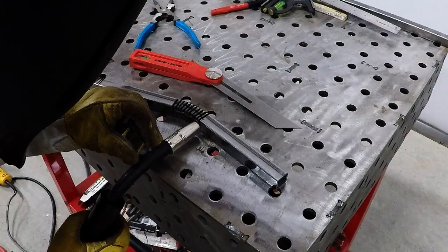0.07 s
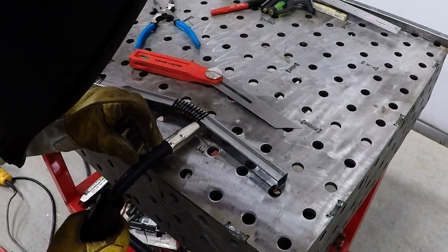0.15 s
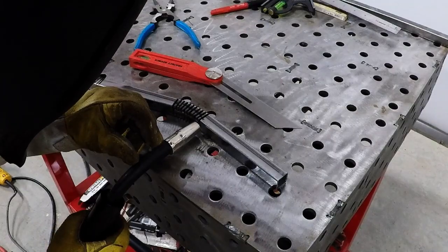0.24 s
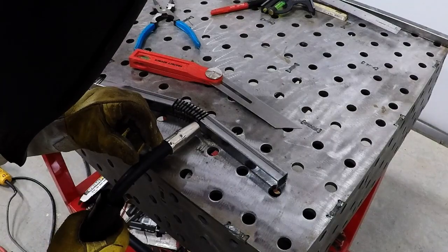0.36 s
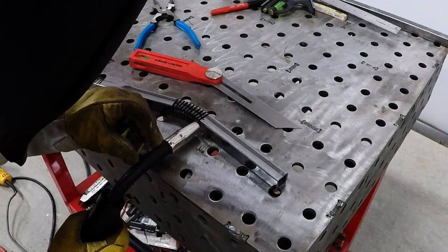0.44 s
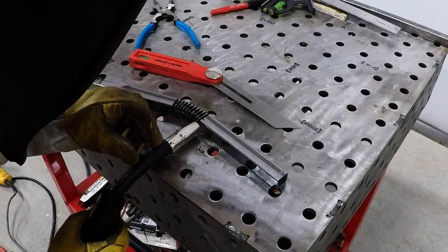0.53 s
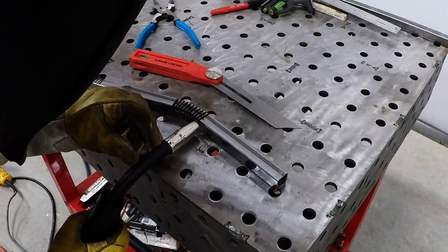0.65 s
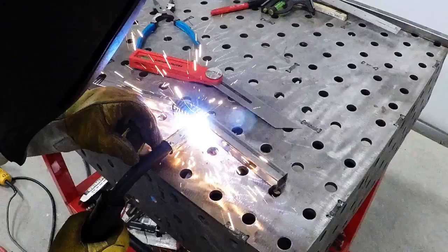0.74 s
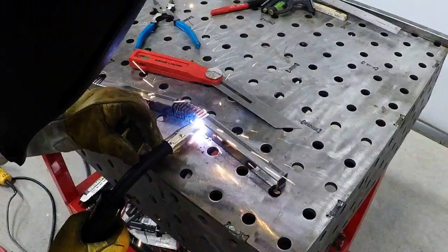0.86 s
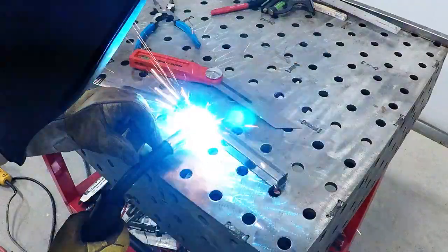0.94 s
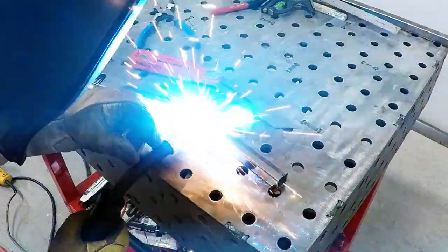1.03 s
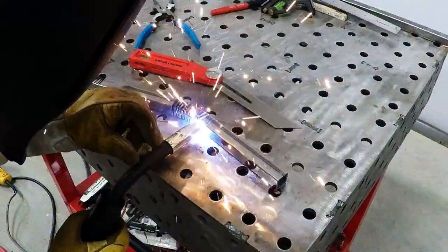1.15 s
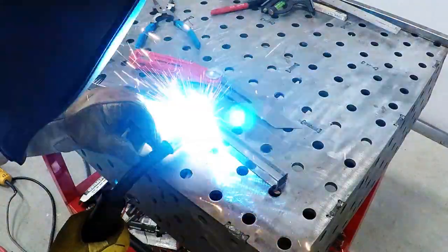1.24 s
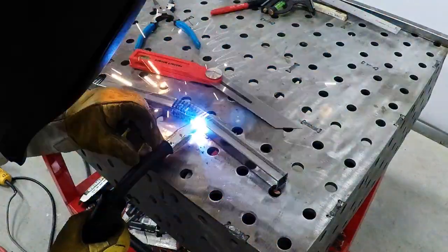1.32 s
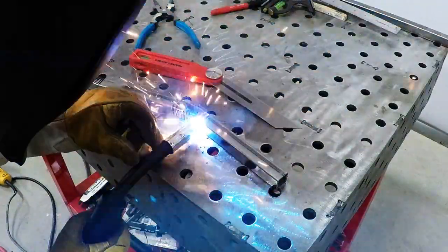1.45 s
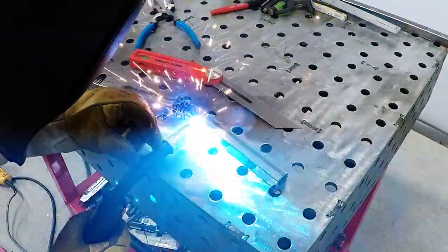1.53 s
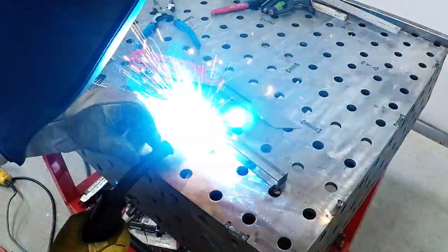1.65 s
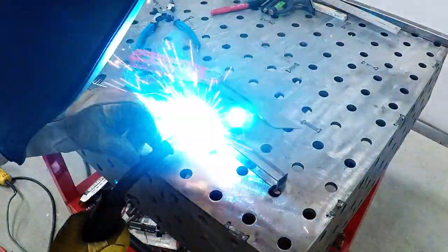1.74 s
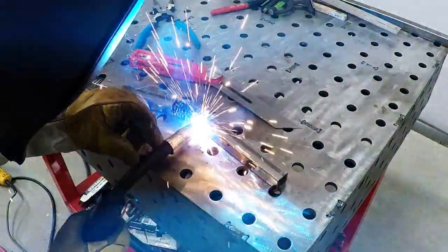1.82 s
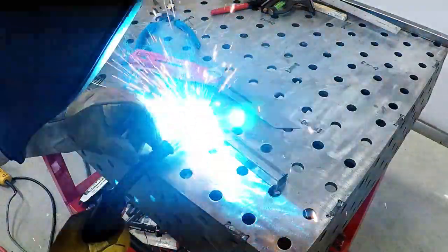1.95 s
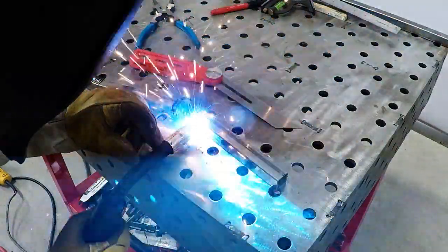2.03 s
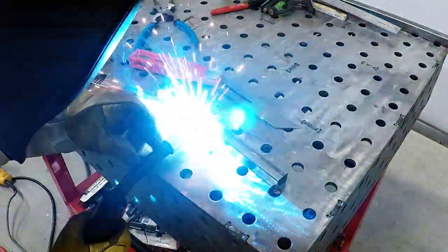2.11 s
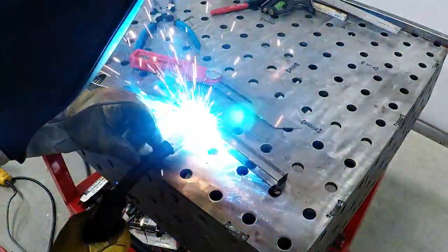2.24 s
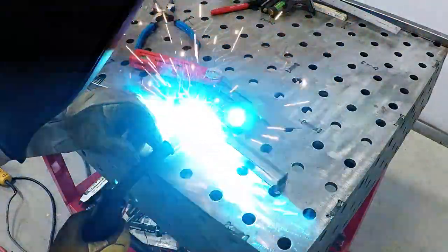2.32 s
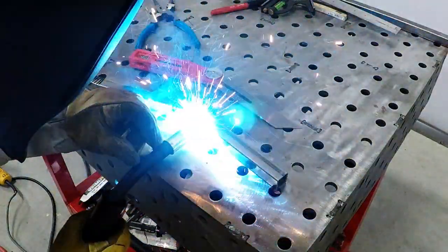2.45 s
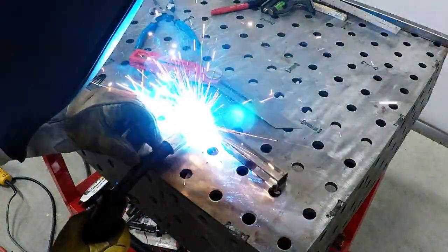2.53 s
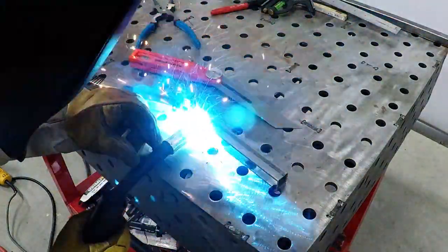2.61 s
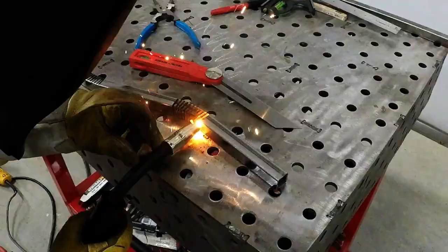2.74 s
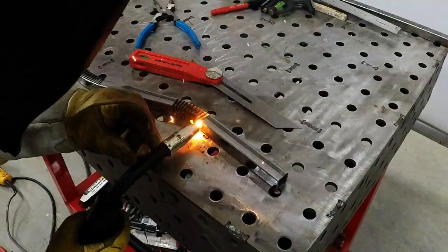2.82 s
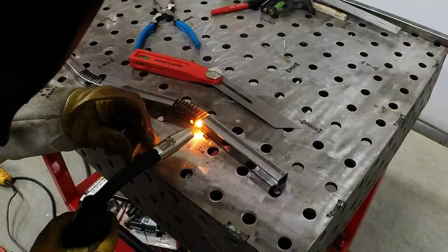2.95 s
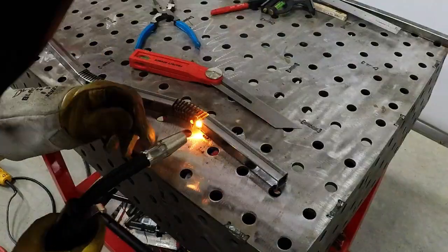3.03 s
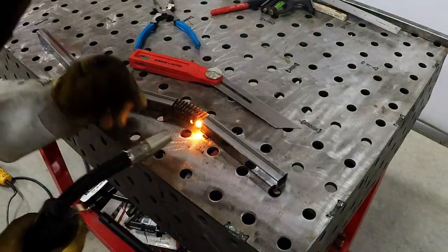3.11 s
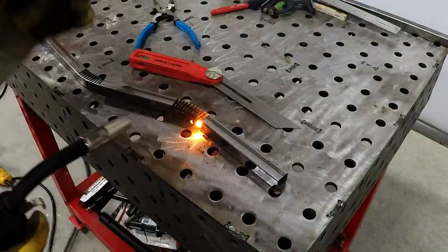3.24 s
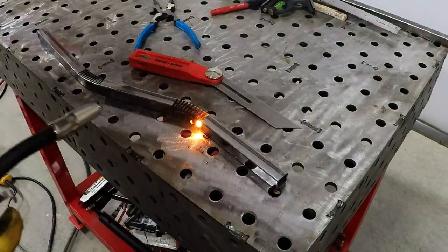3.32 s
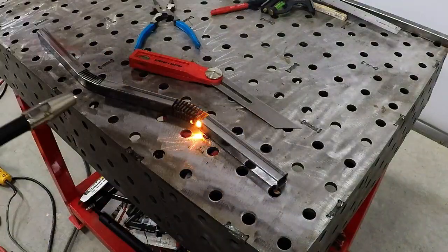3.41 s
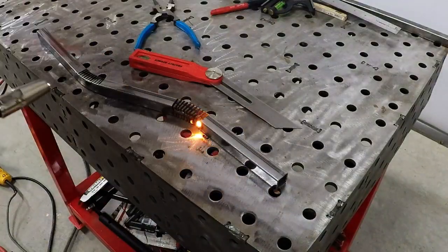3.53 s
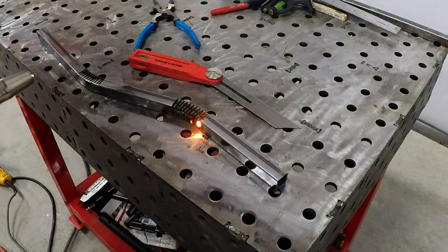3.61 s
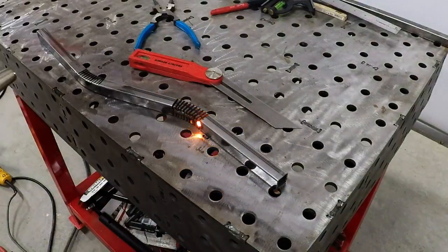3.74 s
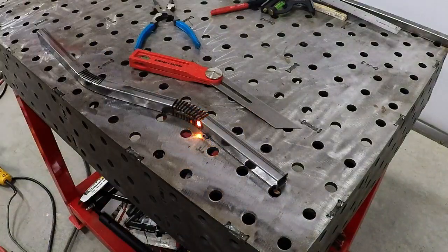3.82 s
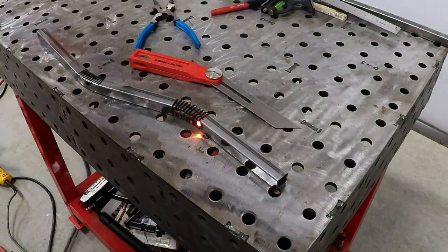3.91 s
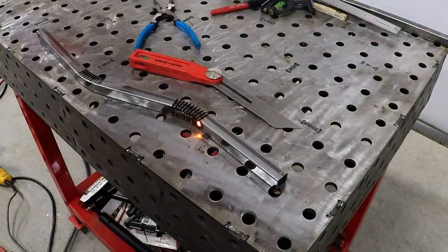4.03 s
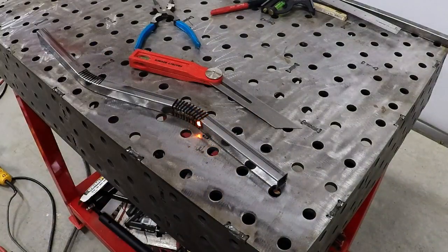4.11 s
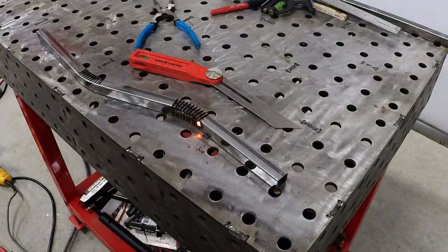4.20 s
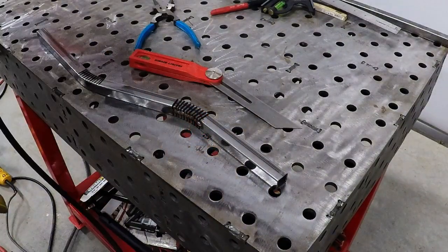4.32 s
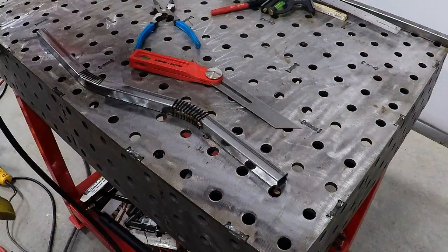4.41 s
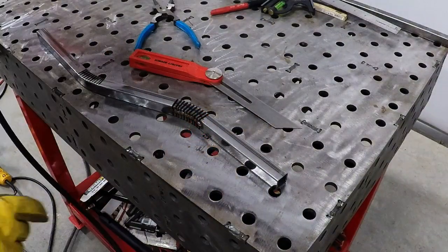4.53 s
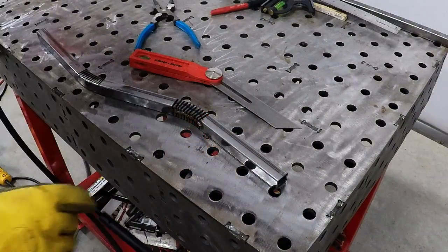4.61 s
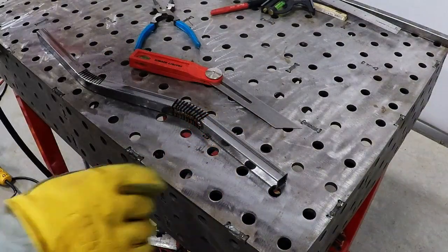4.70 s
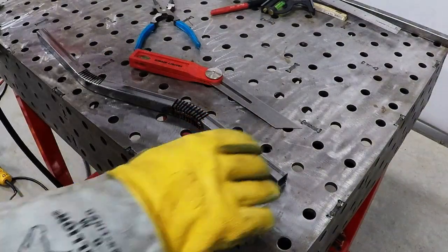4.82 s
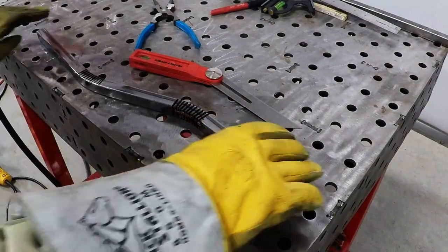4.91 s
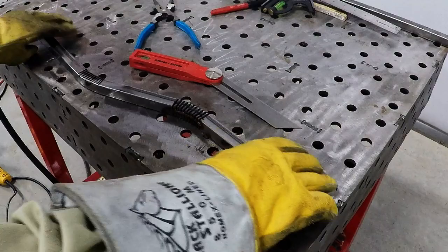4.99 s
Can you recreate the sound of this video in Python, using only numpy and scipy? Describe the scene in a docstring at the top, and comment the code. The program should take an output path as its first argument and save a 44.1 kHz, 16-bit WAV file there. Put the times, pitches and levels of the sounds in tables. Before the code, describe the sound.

Close-up short weld: gas hiss, violent snaps, fast buzzing crackle for under two seconds, then quiet fan hum with small torch knocks.

```python
"""A fan hums in a workshop; shielding gas then hisses from a wire-feed torch close to a small microphone.
The wire strikes with a sputter and a few loud pops, then short-circuits about 65 times a second, tacking
two steel bars on a perforated steel table. Hum is sines and noise, gas and sizzle are shaped noise, and
pops are clicks rung through resonances. Decaying steps jolt the microphone around the loudest pops.
Torch and cable knock afterwards, and gloves rustle: short puffs and fluttering noise."""
import sys
import numpy as np
from scipy import signal
from scipy.fft import rfft, irfft, next_fast_len
from scipy.io import wavfile
from scipy.ndimage import uniform_filter1d, map_coordinates

SR = 44100
rng = np.random.default_rng(int(sys.argv[2]) if len(sys.argv) > 2 else 0)


def pcm_store(signal):
    """Save signal as 16-bit PCM."""
    levels = np.round(np.clip(np.atleast_2d(signal), -1, 1) * 32767)
    wavfile.write(sys.argv[1], SR, levels.astype(np.int16).T)


def ratio(d):
    """dB to gain"""
    e = np.asarray(d, float) / 20
    return 10 ** e


N = 223099
STRIKE_S, ARC_OFF_S = 0.66, 2.68


def unit(x):
    """Normalisation by signal power: scaled to rms 1."""
    return x / np.sqrt(np.mean(x ** 2) + 1e-20)


def along(points, hz):
    """Spectral envelope: (f/Hz, value) points interpolated on a logarithmic frequency axis."""
    f, v = np.transpose(points)
    return np.interp(np.log(hz + 1), np.log(f + 1), v)


def wobble(rate):
    """Band-limited fluctuation: a smooth random curve with rate knots a second."""
    return map_coordinates(rng.standard_normal(int(N * rate / SR) + 4), [np.arange(N) * rate / SR])


def filtered(x, response):
    """Linear filtering: the spectrum of x times a complex response of frequency."""
    m = next_fast_len(len(x) + SR)
    return irfft(rfft(x, m) * response(np.fft.rfftfreq(m, 1 / SR)), m)[:len(x)]


def rush(spectrum, patchy_db):
    """Turbulence noise: coloured noise of rms 1 with time-frequency patches of random gain."""
    z = signal.stft(rng.standard_normal(N), nperseg=512)[2]
    field = uniform_filter1d(uniform_filter1d(rng.standard_normal(z.shape), 6, 0), 10, 1)
    noise = signal.istft(z * ratio(patchy_db * unit(field)), nperseg=512)[1][:N]
    return unit(filtered(noise, lambda hz: ratio(along(spectrum, hz))))


def peak(s, db, rise, fall):
    """Exponential growth and decay: dB climbs straight to db at s, then falls, both in dB/s."""
    u = np.arange(N) / SR - s
    return db + np.minimum(rise * u, -fall * u)


def shop():
    """Tonal and broadband fan noise: unsteady sines and air noise, sinking under the arc and swelling back."""
    # spectrum of the air noise: f/Hz, relative level/dB
    air_spectrum = [(10, -12.5), (50, -23.5), (150, -23), (270, -4.5), (432, -9.5), (505, -13), (590, -5.5),
                    (700, -7.5), (770, -18.5), (1080, -14.5), (2360, -21), (3400, -22), (6300, -30.5),
                    (9300, -36), (10200, -43), (15250, -46.5), (15400, -81)]
    # tones of the fan: f/Hz, mean level/dB rms before the sinking
    fan_tones = [(89.8, -72.5), (273.5, -55), (467.5, -53.5), (920, -66), (1050.5, -54), (1314, -73),
                 (1333, -63.5), (1400, -71.5), (1576, -70.5), (2132, -73.5), (2299, -61.5), (2331, -68.5)]
    sink_s, sink_db_per_s, sunk_db, swell_db_per_s = 0.99, 94, -16, 16
    t = np.arange(N) / SR
    tones = np.zeros(N)
    for hz, db in fan_tones:
        level = np.sqrt(2) * ratio(db + 1.4 * wobble(7))
        tones += level * np.sin(2 * np.pi * hz * t + 1.5 * wobble(7.6))
    floor_db = sunk_db + swell_db_per_s * np.maximum(t - ARC_OFF_S, 0)
    level_db = np.minimum(np.maximum(-sink_db_per_s * (t - sink_s), floor_db), 0)
    air = rush(air_spectrum, patchy_db=0.7)
    return ratio(level_db) * (tones + ratio(-48.5 + 0.4 * wobble(6.7)) * air)


def gas():
    """Jet turbulence and hose resonance: a surge settles to a steady hiss; a narrow band glides down."""
    # spectrum of the jet: f/Hz, relative level/dB
    jet_spectrum = [(1120, -21), (1900, -9.5), (2580, -12), (4920, -12.5), (5420, -7.5), (7350, -19.5),
                    (8980, -7), (11300, -19.5), (13500, -6.5), (15300, -12.5)]
    valve_s, surge_db, sag_db_per_s, flow_db, shut_db_per_s = 0.409, -34.5, 50.5, -55.5, 149
    hose_hz, start_hz, puff_s, glide_s = 1510, 2423, 0.011, 0.004  # a high puff, then the band drops
    hose_peak_db, hose_sag_db_per_s, hose_shut_db_per_s = -37.5, 28, 250
    t = np.arange(N) / SR
    surge = peak(valve_s, surge_db, 6500, sag_db_per_s)
    steady = peak(valve_s, flow_db, 6000, 0)
    jet_db = np.maximum(surge, steady) - shut_db_per_s * np.maximum(t - ARC_OFF_S, 0)
    jet = ratio(jet_db) * rush(jet_spectrum, patchy_db=0.6)

    hz = hose_hz + (start_hz - hose_hz) * np.exp(-np.maximum(t - valve_s - puff_s, 0) / glide_s)
    phase = 2 * np.pi * np.cumsum(hz) / SR
    hose_db = peak(valve_s, hose_peak_db, 9000, hose_sag_db_per_s)
    hose_db = hose_db - hose_shut_db_per_s * np.maximum(t - STRIKE_S, 0)
    band = wobble(850) * np.sin(phase) + wobble(850) * np.cos(phase)
    return jet + ratio(hose_db) * unit(band)


def body(f, fresh, shift=0):
    """Modal superposition as a causal filter: a product of second-order resonances and cancellations.

    A fresh joint rings higher in the bass and gathers energy near 4.35 kHz; one narrow mode rings on."""
    # resonances (+) and cancellations (-) of nozzle, bars and table, before shifts: f/Hz, width/Hz, level/dB
    surroundings = [(540, 200, -3.5), (1075, 388, 18), (1128.5, 145, -16.5), (1434, 170, 5),
                    (2060, 365, 17.5), (2240, 356, -22.5), (3168, 1360, 16.5), (3277, 333, -8),
                    (4007, 390, 7), (5018, 520, -13), (5154, 185, 11.5), (5500, 43, 5), (6480, 650, -5.5),
                    (7140, 170, -7), (8273, 860, -10), (8560, 190, 10.5), (9900, 460, 8), (10300, 670, -20),
                    (11690, 270, -21.5), (12300, 590, 3), (13300, 200, -11.5), (13900, 1900, 6.5)]
    modes = []
    for c, width, db in surroundings:
        moved = 1 + 0.084 * fresh * (c < 2500) + shift * (c > 5500)
        modes.append((c * moved, width, db))
    modes += [(4350, 400, 7 * fresh), (1055 + 70 * fresh, 40, 5)]
    bells = []
    for c, width, db in modes:
        stiffness = c * c - f * f
        damping = 1j * f * width
        bells.append((stiffness + damping * ratio(db / 2)) / (stiffness + damping / ratio(db / 2)))
    return ratio(-1.2 * fresh) * np.prod(np.broadcast_arrays(*bells), axis=0)


def sizzle():
    """Arc noise: fluttering broadband noise that takes on some of the colour of the pops."""
    # source spectrum: f/Hz, relative level/dB
    source_spectrum = [(60, -26.5), (250, -11.5), (500, -5), (1000, 1.5), (3000, 2), (6000, 6.5),
                       (10000, 6), (15000, 1), (16000, 2)]
    # course of the sizzle before its flutter: t/s, level/dB
    course = [(.65, -70), (.665, -25.5), (.72, -36), (.8, -38.5), (.95, -31.5), (1.05, -33.5), (1.1, -42),
              (1.6, -41.5), (2.6, -38.5), (2.7, -47.5), (2.81, -55), (2.88, -65), (3.0, -80)]
    source = rush(source_spectrum, patchy_db=0.0)
    noise = unit(filtered(source, lambda hz: np.abs(body(hz, 0.3)) ** 0.25))
    s, db = np.transpose(course)
    return ratio(np.interp(np.arange(N) / SR, s, db)) * ratio(wobble(66)) * noise


def freshness(s):
    """Exponential relaxation: 1.15 at the strike, sinking ever more slowly as the joint fills."""
    filled, fill_s = -0.35, 1.34  # final value, time constant
    return filled + (1.15 - filled) * np.exp(-(s - STRIKE_S) / fill_s)


def short_circuits():
    """Quasi-periodic point process: time and click dB of every pop; beat and size waver inside a run."""
    # pops timed one by one, some between or inside the runs: t/s, click level/dB
    single = [(.6648, 2), (.683, -3), (.6858, 7.5), (.8118, 15), (.8778, 9.5), (.8957, 10), (.9058, 11),
              (.9122, 4.5), (1.0314, -0.5), (1.0369, 4.5), (1.0551, 4), (1.0749, 2), (1.1135, 1),
              (1.1515, 3), (1.1623, -4), (1.186, 1.5), (1.2047, 4.5), (1.2563, 3), (1.5592, 0),
              (1.5663, 5.5), (1.5807, -1.5), (1.5925, -7.5), (1.675, 2.5), (1.9099, 2), (2.0144, 0.5),
              (2.4795, 1.5), (2.5158, 1), (2.604, -4.5), (2.6405, 2), (2.6615, -3), (2.6714, 0.5)]
    # runs of evenly spaced pops, before jitter: first t/s, last t/s, approximate rate/(pops per s), mean click level/dB
    runs = [(0.6677, 0.6786, 415, 5), (0.692, 0.705, 140, -8), (0.9215, 1.0122, 100, 2.5),
            (1.307, 1.3951, 67.6, -2), (1.4226, 1.4774, 77.4, -3), (1.5042, 1.5303, 82, -1.5),
            (1.621, 1.6316, 91, -2.5), (1.6625, 1.6898, 36, -3), (1.7059, 1.7383, 64, -2),
            (1.7555, 1.7996, 68, -3), (1.807, 1.8545, 53.5, -1.5), (1.8778, 1.893, 65, -1.5),
            (1.9245, 1.984, 67, -0.5), (2.0324, 2.0465, 71, -1), (2.0643, 2.1092, 67, -1.5),
            (2.1275, 2.157, 68, -1), (2.175, 2.189, 72, -2), (2.2061, 2.2487, 69, -1),
            (2.2651, 2.308, 69, 1), (2.325, 2.3419, 57, -3), (2.356, 2.3721, 61, -1.5),
            (2.386, 2.4286, 69, -3), (2.4446, 2.4609, 64, -1.5), (2.496, 2.511, 71, -1.5),
            (2.5311, 2.584, 57, -6), (2.6133, 2.6227, 123, 0.5)]
    jitter_s, scatter_db = 0.0006, 1.7  # standard deviations; jitter is held to 6 % of the beat
    rows = list(single)
    for first, last, rate, db in runs:
        chance = rng.standard_normal((16, 2))
        s = np.linspace(first, last, round((last - first) * rate) + 1)
        s[1:-1] += min(jitter_s, 0.06 / rate) * chance[:len(s) - 2, 0]
        rows += zip(s, db + scatter_db * chance[:len(s), 1])
    return np.transpose(sorted(rows))


def pops(s, click_db):
    """Impulse excitation: inward clicks, ragged at the edge, with dying spatter, ring the surroundings."""
    steady_s, dying_s = 0.75, 2.65
    cold_db, dying_db = -5.5, -13  # treble change while the arc is not yet, and no longer, fully alight
    beat_s, late_db_per_s, late_max_db = 0.015, 1200, 3.5
    wander = 0.02  # relative spread of the treble resonances as the arc root moves
    fresh, tint = freshness(s), rng.standard_normal((len(s), 3))

    bass_db = 3 - 2.5 * fresh + 0.053 * click_db + 0.85 * tint[:, :1]
    # once the pool is wide, a late drop has grown bigger and bursts fuller; an early one is thinner
    late_s = np.diff(s, axis=0, prepend=0) - beat_s
    late_db = np.clip(late_db_per_s * late_s, -late_max_db, late_max_db)
    bass_db = bass_db + late_db * np.clip(1 - 2 * fresh, 0, 1)
    treble_db = 4.13 - 0.272 * click_db - 0.1 * tint[:, 1:2]
    treble_db = treble_db + cold_db * (s < steady_s) + dying_db * (s > dying_s)

    steps = np.arange(4096)
    t, f = steps / SR, np.fft.rfftfreq(len(steps), 1 / SR)
    chance = rng.standard_normal((len(s), len(t)))
    edge = rfft(0.13 * chance * ratio(-60 * t / 0.0015))
    ragged = edge / (1 + (5000 / (f + 1)) ** 4)  # only the treble is ragged
    # big pops throw more spatter, relative to the click
    dying = ratio(-30 + 0.56 * click_db - 60 * t / 0.032) * (1 - np.exp(-t / 0.00037))
    spatter = ragged + rfft(chance * dying) / (1 + 1j * f / 9000)

    bass = 1 + (ratio(bass_db) - 1) / (1 + 1j * f / 1800) ** 2
    treble = 1 + (ratio(treble_db) - 1) / (1 + (5500 / (f + 1)) ** 6)
    rebound = (1j * f - 460) / (1j * f + 460)  # all-pass: the bass swings back after the click
    low_cut = 1j * f / (260 + 1j * f)
    colour = body(f, fresh, wander * tint[:, 2:]) * bass * treble * rebound * low_cut
    rung = ratio(click_db) * irfft((spatter - 1) * colour) * (t < 0.08)
    start = (s + rng.uniform(-5e-5, 5e-5, s.shape)) * SR
    return np.bincount((np.round(start).astype(int) + steps).ravel(), rung.ravel(), N)


def room(x):
    """Frequency-dependent reverberation: each band of a noise tail decays with its own T60."""
    # decay of the workshop: f/Hz, T60/s
    decay = [(300, 0.36), (2000, 0.42), (8000, 0.157), (15000, 0.24)]
    hz, t, z = signal.stft(rng.standard_normal(SR // 2), SR, nperseg=256)
    fading = z * ratio(-60 * t / along(decay, hz)[:, None])
    tail = signal.istft(fading, SR, nperseg=256)[1]
    delayed = np.pad(x, (300, 0))  # samples
    return signal.fftconvolve(delayed, tail / np.linalg.norm(tail))[:N]


def jolts(pop_s):
    """Two-stage high-pass step response: jolts of the microphone's resting point set in and drain away.

    Every pop adds a small random nudge."""
    # large jolts: t/s, signed step (linear amplitude), rise time constant/s
    large = [(0.8118, 0.46, 0.00017), (0.897, -0.055, 0.00044), (0.906, 0.19, 0.0003),
             (1.013, -0.06, 0.00039), (1.038, -0.22, 0.0011), (1.057, 0.17, 0.00035), (1.151, -0.03, .0005),
             (1.163, -0.67, 0.0033), (1.186, 0.13, 0.0004), (1.203, 0.069, 0.00082), (1.256, 0.11, 0.00057)]
    fast, slow = 0.029, 0.096  # time constants of the coupling stages, s
    steps, u = np.zeros(N + SR), np.arange(SR) / SR
    sizes = 0.0029 * rng.standard_normal(len(pop_s))
    nudges = [(s, step, 0.002) for s, step in zip(pop_s, sizes)]
    for s, step, rise in list(large) + nudges:
        steps[round(s * SR):][:2000] += step * np.exp(-u[:2000] / rise) / (rise * SR)
    drain = (slow * np.exp(-u / fast) - fast * np.exp(-u / slow)) / (slow - fast)
    return signal.fftconvolve(steps, drain)[:N]


def knocks():
    """Damped impact: each dull tap is a decaying sine with a puff of noise around the same pitch."""
    # small knocks of torch and cable: t/s, level before onset and decay/dB, f/Hz
    taps = [(3.421, -37, 580), (3.702, -38.5, 1230), (3.747, -36, 1120), (3.752, -37.5, 130),
            (3.798, -36.5, 348)]
    out, t = np.zeros(N), np.arange(SR // 20) / SR
    envelope_db = -60 * t / 0.06
    onset = 1 - np.exp(-t / 0.0019)
    for s, db, hz in taps:
        def resonance(f):
            """Second-order band-pass, applied twice."""
            return (1j * f * 700 / (hz * hz - f * f + 1j * f * 700)) ** 2
        puff = unit(filtered(rng.standard_normal(len(t)), resonance))
        tap = 0.37 * np.sin(2 * np.pi * hz * t) + 0.92 * puff
        out[round(s * SR):][:len(t)] += ratio(db + envelope_db) * onset * tap
    return out


def gloves():
    """Friction noise: leather gloves and sleeve rub as fluttering coloured noise."""
    # spectrum of the leather: f/Hz, relative level/dB
    leather_spectrum = [(590, -40), (1000, -14), (1040, -6), (1190, -16), (2500, 1), (3600, -4.5),
                        (5500, -4.5), (9150, -15.5), (15500, -27)]
    # strokes before the flutter: loudest t/s, level/dB, rise/(dB/s), fall/(dB/s)
    strokes = [(3.485, -53.5, 348, 120), (3.52, -52.5, 152.5, 250), (3.55, -37.5, 299, 504),
               (3.68, -59.5, 64, 56.5), (4.615, -49.5, 350, 250)]
    leather = rush(leather_spectrum, patchy_db=0.6)
    level = sum(ratio(peak(*row)) for row in strokes)
    return level * ratio(1.3 * wobble(120)) * leather


def scene():
    """Linear superposition: arc and its reverberation over the hum; jolts arise in the microphone itself."""
    s, click_db = short_circuits()
    arc = pops(s[:, None], click_db[:, None])
    welding = arc + ratio(-26.5) * room(arc) + sizzle() + gas()
    return (welding + shop() + gloves() + knocks() + jolts(s))[None]


def roll_off(x):
    """The treble ends steeply here."""
    return signal.sosfilt(signal.butter(12, 16500, fs=SR, output="sos"), x)


def record(dry):
    """Saturation and band limiting: peaks round off towards 1.45, then the treble is cut steeply."""
    x = dry[0]
    clipped = x / (1 + np.abs(x / 1.45) ** 8) ** (1 / 8)

    def band_limit(hz):
        """Steep low-pass at 15.3 kHz over a weak path that reaches 16.5 kHz."""
        return 0.88 / (1 + (hz / 15300) ** 80) + 0.062 * (hz < 16500)
    mix = filtered(clipped, band_limit)[None]
    return roll_off(mix)


dry = scene()
out = record(dry)
pcm_store(out)
```